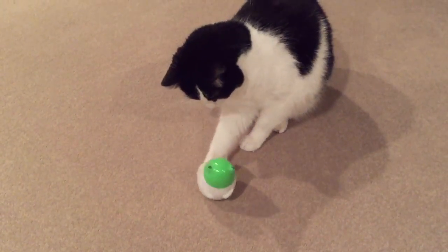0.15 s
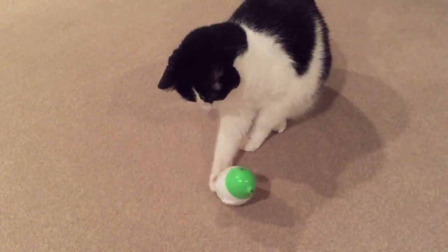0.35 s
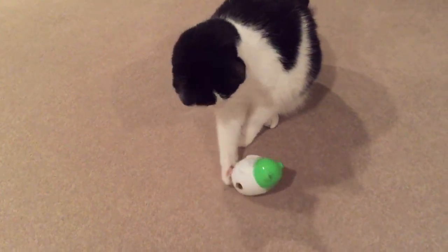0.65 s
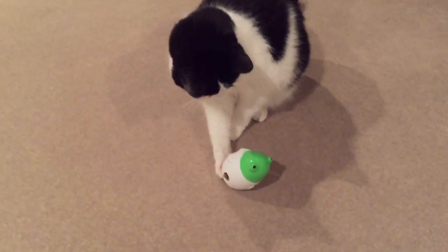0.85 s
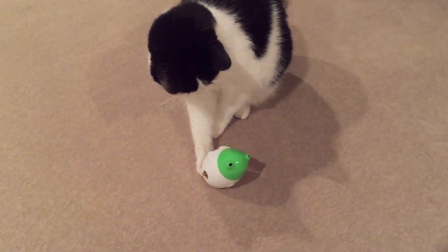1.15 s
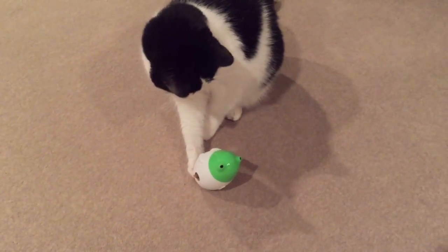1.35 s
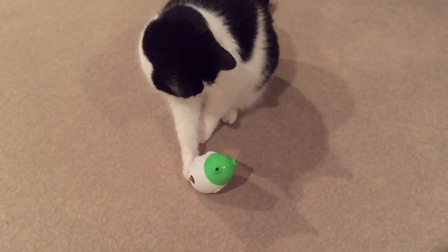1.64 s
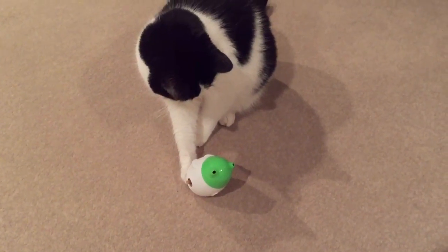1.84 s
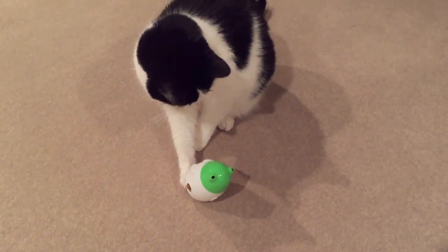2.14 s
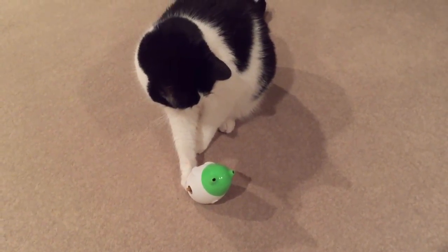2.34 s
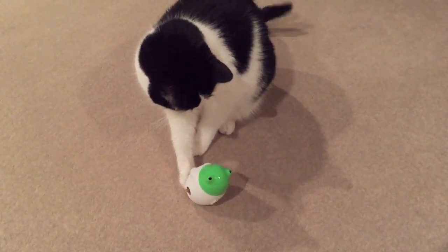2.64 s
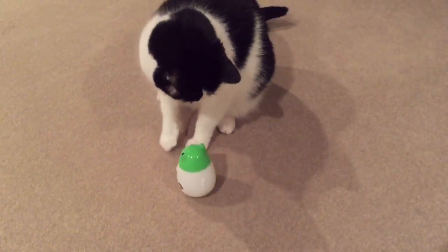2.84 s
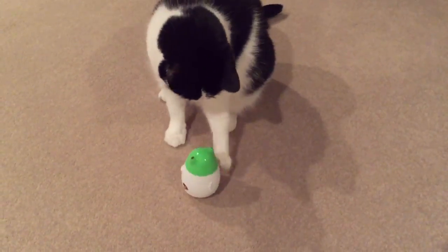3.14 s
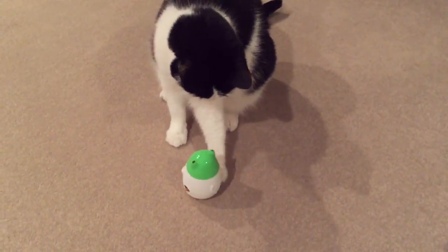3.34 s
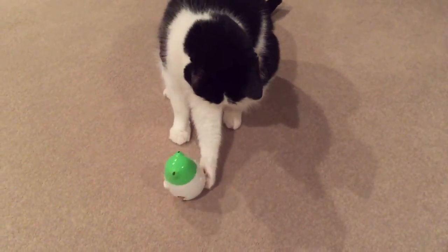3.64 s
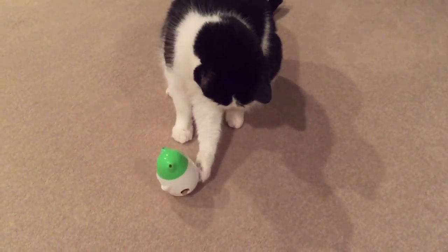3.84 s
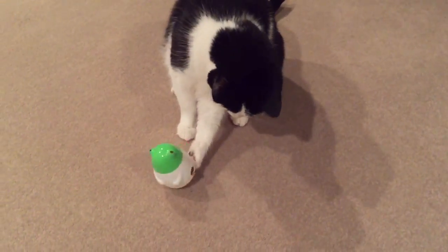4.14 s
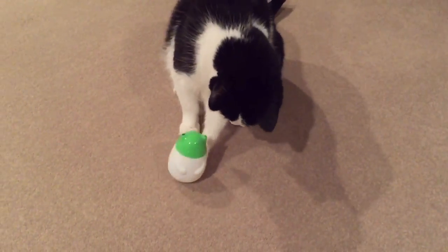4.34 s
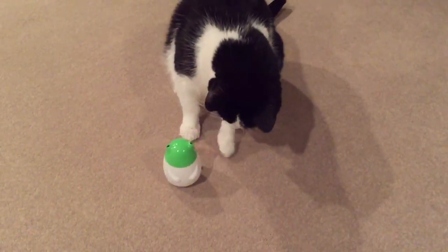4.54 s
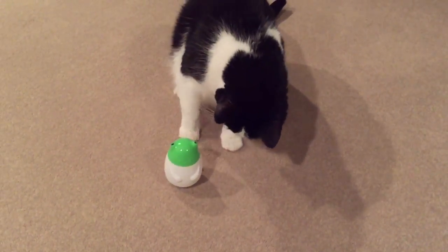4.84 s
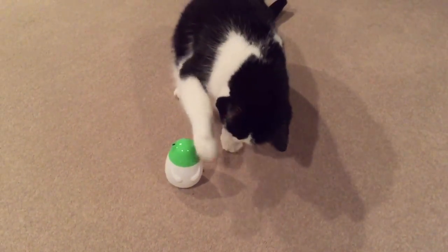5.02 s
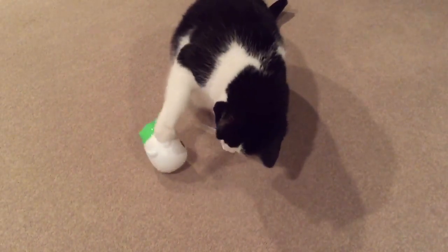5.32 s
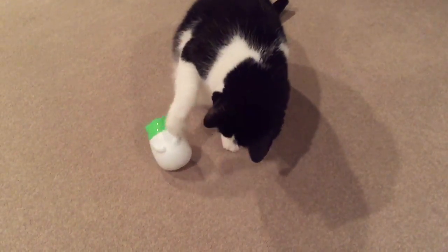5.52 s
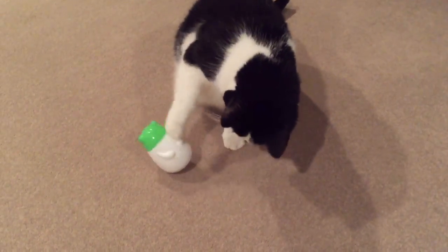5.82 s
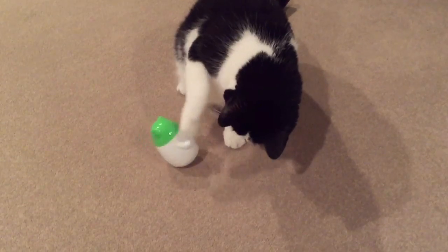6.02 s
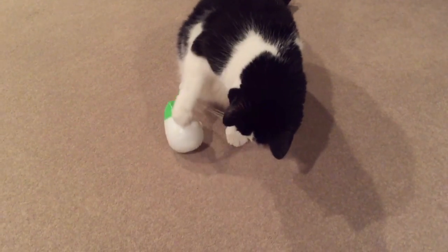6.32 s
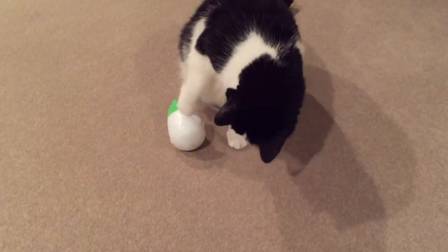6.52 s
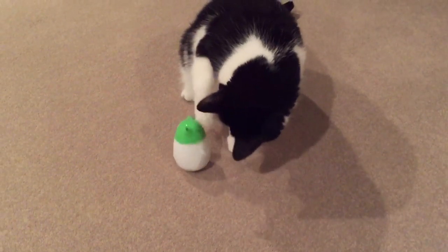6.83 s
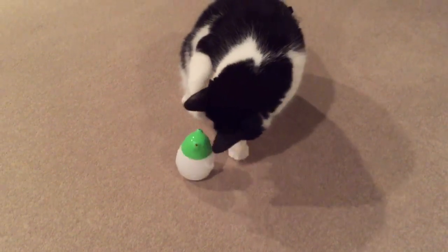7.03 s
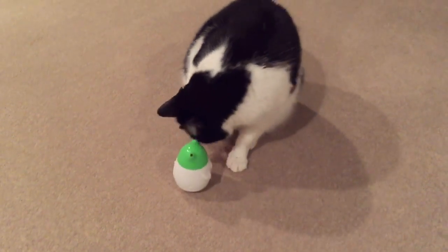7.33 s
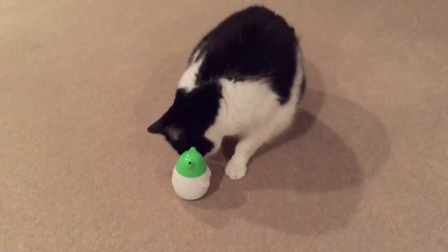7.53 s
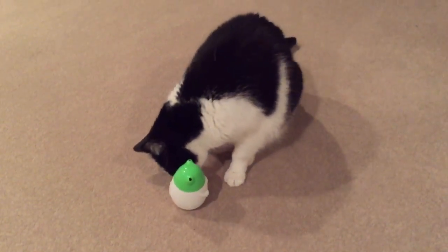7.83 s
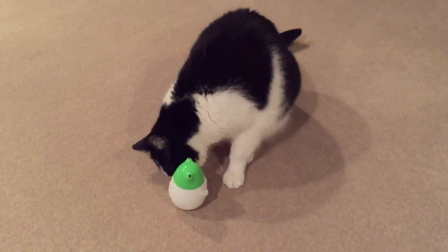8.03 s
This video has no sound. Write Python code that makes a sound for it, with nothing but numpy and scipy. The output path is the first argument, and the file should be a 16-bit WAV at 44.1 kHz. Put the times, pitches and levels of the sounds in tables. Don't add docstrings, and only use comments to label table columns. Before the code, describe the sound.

Close up in a small carpeted room, a cat paws a hollow plastic treat toy. Dull knocks and light clicks come first, then quiet with only faint low house rumble and microphone hiss. A few soft taps follow, another pause, then brisk rattling bursts of dry treats as it is rolled, dragged and swung upright, ending on bright clicks and quiet.

```python
import sys
import numpy as np
from scipy import signal
from scipy.fft import rfft, irfft, next_fast_len
from scipy.io import wavfile
from scipy.ndimage import map_coordinates

SR = 44100
rng = np.random.default_rng(int(sys.argv[2]) if len(sys.argv) > 2 else 0)


def amplitude_ratio(level_db):
    exponent = np.asarray(level_db, float) / 20
    return 10 ** exponent


def materialize(psi):
    bounded = np.clip(np.atleast_2d(psi).T, -1, 1)
    quanta = np.round(bounded * 32767).astype(np.int16)
    wavfile.write(sys.argv[1], SR, quanta)


N = 360289

# time [s], level [dB].
HOUSE_RUMBLE = [(0.0, -57), (0.7, -66), (0.77, -60.5), (1.48, -65), (1.59, -54), (1.68, -66), (1.82, -58),
                (1.98, -70), (2.0, -59.5), (4.69, -60.5), (5.44, -65), (5.48, -61.5), (6.91, -59.5),
                (6.96, -74), (7.12, -57), (7.83, -64), (8.1, -53.5), (8.17, -55.5)]
# frequency [Hz], width [Hz], level [dB].
ROOM_BOOM = [(59.7, 6.1, 4), (78.7, 13, 1.5), (103.1, 7.4, 2), (120, 9.4, -18)]
# frequency [Hz], 60 dB decay time [s].
ROOM_DECAY = [(400, 0.18), (1500, 0.19), (3000, 0.21), (6000, 0.15), (11000, 0.16), (16000, 0.097)]
# frequency [Hz], level per Hz [dB].
MIC_HISS = [(88, -30), (150, -5.5), (242, -1.5), (295, -9), (332, -1), (359, -9.5), (439, -9.5),
            (514, -13.5), (568, -11), (812, -16.5), (952, -14.5), (1140, -16), (3200, -18.5), (4850, -20.5),
            (17300, -28.5)]
# frequency [Hz], width [Hz], depth [dB].
MIC_DIPS = [(4900, 250, -3.5), (7700, 350, -2.5), (10450, 380, -7)]
# start [s], length [s], slide of the crumbs [dB], carpet rub [dB].
PUSHES = [(-0.05, 0.12, -59, -65), (0.211, 0.025, -59, -82), (0.07, 0.15, -83, -69),
          (0.308, 0.19, -60, -66.5), (0.529, 0.14, -69, -64), (0.645, 0.23, -63, -64.5),
          (2.9, 0.28, -87, -77), (3.528, 0.17, -63, -63.5), (3.77, 0.21, -71, -68.5),
          (4.087, 0.22, -69, -71.5), (5.344, 0.062, -79, -56), (5.453, 0.061, -66, -64),
          (5.528, 0.054, -38, -73), (5.79, 0.094, -58, -54.5), (6.04, 0.055, -53.5, -93),
          (6.246, 0.3, -65, -64), (6.556, 0.13, -43.5, -59), (7.016, 0.063, -68, -62),
          (7.082, 0.16, -48.5, -61)]
# time [s], peak [dB], hollow pitch [Hz], wall thud [dB].
KNOCKS = [(0.09, -37, 584, 0), (0.255, -57, 610, 5.5), (0.3615, -47, 576, 3), (0.551, -42, 526, -1.5),
          (0.662, -44.5, 560, -1), (3.0, -75, 600, 13), (3.025, -55.5, 630, 5.5), (3.553, -52.5, 510, 3),
          (3.6655, -54, 557, 8), (3.677, -48.5, 512, 5.5), (4.273, -50, 600, 4), (4.502, -48, 570, -4),
          (5.3655, -42.5, 560, 4), (5.38, -46, 568, -19), (5.833, -56, 585, -14), (5.87, -58, 600, 3),
          (6.4322, -38, 539, -5), (6.482, -56, 575, -12), (6.636, -42.5, 506, -1.5),
          (7.036, -56.5, 486, -20), (7.087, -50, 495, -1), (7.146, -44.5, 562, -2), (7.104, -50, 547, -15),
          (7.18, -56, 550, -20)]
# frequency [Hz], level [dB], 60 dB decay time [s].
SHELL_MODES = [(1660, -13.5, 0.058), (2050, -13.5, 0.054), (2380, -11.5, 0.013), (2750, -14, 0.054),
               (3250, -12, 0.028), (3550, -10.5, 0.042), (3930, -9.5, 0.025), (4250, -11, 0.022),
               (4790, -13.5, 0.02), (5280, -10.5, 0.017), (5620, -9, 0.0089), (6130, -10.5, 0.01),
               (7100, -12, 0.01), (8970, -13.5, 0.013)]
# frequency [Hz], level [dB].
CONTACT_NOISE = [(2000, -32), (5000, -1.5), (8000, -1), (11000, -13), (14000, -12), (17000, -35)]
# time [s], peak [dB], main mode [Hz], second mode [Hz], sharp tick [dB].
STRIKES = [(0.4212, -34.5, 3580, 7100, 1), (0.7579, -33, 5620, 3450, -15), (0.963, -29, 5540, 3900, -6),
           (3.036, -34, 5000, 2250, -9.5), (3.9623, -28, 4360, 5700, -32), (5.454, -43, 3820, 5250, 7),
           (5.4663, -27.5, 3700, 2830, -6), (5.529, -30, 3220, 4730, -17), (5.538, -22.5, 3970, 2920, -10),
           (5.5465, -22.5, 3260, 3980, -3), (5.5546, -28, 2830, 4260, -2.5),
           (5.5671, -25.5, 3700, 4800, -6), (6.0023, -41, 3500, 1730, -4), (6.057, -31, 3800, 4160, 1),
           (6.5977, -25, 3300, 4260, -20), (6.6076, -21.5, 5230, 3300, -8), (6.6234, -23, 4150, 5540, 1),
           (6.6414, -38, 3060, 4090, -1), (6.67, -26.5, 3730, 2170, -10), (7.0108, -31, 5930, 3930, -32),
           (7.0874, -27, 2440, 4200, -17), (7.139, -25, 3730, 6600, -7.5), (7.1643, -29, 5660, 3700, -6),
           (7.1908, -18, 5060, 3040, -12)]
# time [s], peak [dB], main mode [Hz], sharp tick
# [dB].
LIGHT_TAPS = [(0.0906, -38.5, 2040, -6), (0.0938, -35, 1880, -38), (0.2493, -46.5, 5650, -15),
              (0.2525, -53, 2140, -20), (0.361, -34, 1630, -23), (0.9878, -44, 3750, -24.5),
              (0.4314, -46, 3930, -23), (0.4689, -50, 5800, -17), (0.5527, -39.5, 1570, -18),
              (0.5549, -51, 1950, -21), (0.6495, -44, 5570, -1), (0.6622, -41, 1940, -29),
              (0.6743, -36, 3170, -6), (0.6875, -45, 3040, -26), (0.705, -42, 3180, -23),
              (0.7198, -38, 3140, -17), (0.7676, -37, 5670, -25), (0.7737, -29, 3380, -11),
              (0.811, -42, 3970, -23), (0.872, -53.5, 4350, 4), (0.887, -56, 4600, -7),
              (2.9033, -60.5, 3960, -7), (2.9662, -39, 2320, -16), (3.0265, -54, 2230, -29),
              (3.052, -50, 3900, -20), (3.555, -48.5, 3660, -28), (3.6668, -50, 3730, -21),
              (3.6759, -37.5, 1910, -37), (3.8078, -54, 4160, -15), (3.8213, -47, 4250, -9),
              (4.0741, -56.5, 3200, -17), (4.273, -53.5, 2050, -7), (4.5037, -51.5, 2170, -27),
              (5.3657, -32.5, 1450, -42), (5.3815, -38.5, 1230, -24), (5.431, -55, 3300, -27),
             (5.63, -44, 3720, -8), (5.495, -42, 3760, -17), (5.7683, -53.5, 2280, 2.5),
             (5.816, -49, 3620, -10), (5.836, -47, 2320, -24), (5.868, -50, 2300, -10),
             (5.894, -45, 3450, -23), (5.9104, -46, 3240, -22), (6.012, -46, 2720, -13),
             (5.8086, -45, 4300, -21), (5.809, -45, 2100, -25), (5.8451, -44.5, 2230, 6),
             (5.852, -46, 4500, -18), (5.8807, -32.5, 3550, -33), (5.886, -42, 1990, -20),
             (5.829, -54, 3500, -12), (5.9265, -33.5, 3570, -11), (5.9443, -41.5, 3600, -7),
             (6.031, -34, 3400, -12), (6.0363, -36.5, 3620, -4), (6.042, -28.5, 4260, -14.5),
             (6.0857, -40, 3660, -5),
              (6.2618, -41.5, 5380, -1), (6.276, -39.5, 3760, -6), (6.281, -40, 3760, -4),
             (6.292, -43.5, 2860, -19), (6.349, -40.5, 2180, -8), (6.368, -48.5, 2110, -21),
             (6.399, -49.5, 3160, -2), (6.4316, -37, 1970, -16), (6.4818, -46, 3440, -12),
             (6.494, -46.5, 2140, -7), (6.53, -39, 5600, 0.5), (6.5336, -40.5, 2170, -25),
             (6.5638, -31, 3630, -11), (6.5771, -35, 3250, -15), (6.604, -36, 5350, 6),
             (6.675, -28, 4970, 6.5), (6.6999, -33, 3800, -10), (7.034, -39, 4100, -9),
             (7.0772, -46, 4000, -25), (7.095, -32, 2140, -14), (7.113, -39, 2580, -26),
             (7.1223, -33.5, 3400, 3), (7.1276, -31, 4050, -16), (7.1884, -38, 3520, -9),
             (6.588, -47, 5200, -8), (7.1775, -50, 2280, -14), (7.1974, -30, 2800, -3.5),
             (7.1994, -33, 4250, -26), (6.1996, -62, 3380, -17), (6.5923, -27, 4100, -14),
             (6.655, -37, 4160, -20), (6.941, -61, 2220, -13), (7.154, -35, 5450, -16)]
# time [s], mode [Hz], level [dB], other mode [Hz], its level [dB].
CONTACT_RINGS = [(0.0912, 3470, -44, 5300, -44.5), (0.0936, 1960, -38.5, 2700, -55),
                 (0.361, 1930, -39, 1294, -43.5), (0.4208, 3420, -38, 4000, -39.5),
                 (0.4208, 7150, -39, 2190, -46), (0.5525, 1950, -43.5, 1600, -47.5),
                 (0.6617, 1940, -41, 1370, -42), (0.674, 3160, -36.5, 5300, -38),
                 (0.674, 3500, -55, 4400, -42), (0.6873, 3100, -44, 1750, -52),
                 (0.7573, 5620, -36, 3500, -35.5), (0.7586, 4660, -35, 1710, -47),
                 (0.7668, 5760, -41, 3920, -43), (0.7742, 1670, -44.5, 4700, -38),
                 (0.7742, 5800, -49, 4230, -50), (0.9629, 5630, -24.5, 3820, -29.5),
                 (0.9878, 3800, -45, 5940, -45), (2.966, 3530, -64, 4060, -65), (3.0367, 3800, -39, 5460, -52),
                 (3.0367, 5300, -42.5, 2330, -40), (3.5544, 3930, -45, 2050, -54.5),
                 (3.6763, 1930, -41.5, 2290, -44.5), (3.9625, 4100, -29, 3550, -39),
                 (3.9625, 5740, -32.5, 5320, -52), (5.3655, 1390, -39, 1900, -45),
                 (5.4531, 3960, -35, 3370, -35), (5.4531, 5190, -39, 6500, -37),
              (5.4656, 3410, -28.5, 2660, -48), (5.4656, 1570, -38.5, 7100, -34.5),
              (5.5283, 3340, -43, 3970, -38), (5.5338, 3160, -34, 3850, -40),
              (5.5328, 2680, -48, 4650, -40), (5.538, 4000, -35, 3180, -32), (5.538, 2800, -40, 3620, -34),
              (5.5462, 3230, -21, 3500, -37), (5.5462, 3900, -29, 4760, -30.5),
              (5.5552, 2810, -28, 3430, -27), (5.549, 1620, -41, 2200, -46), (5.5678, 3600, -39, 4370, -35),
              (5.5678, 3980, -41, 5630, -39), (5.574, 3350, -44, 2900, -51), (5.576, 3800, -38, 2830, -48),
              (5.8447, 2300, -49, 1830, -50), (5.8815, 3550, -43, 4370, -43),
              (5.9264, 2820, -42, 3660, -39), (5.9443, 3500, -43, 4160, -62),
              (6.0018, 3540, -33, 1660, -42), (6.0018, 3180, -42, 2550, -57),
              (6.031, 3700, -33, 3160, -35.5), (6.0307, 1670, -44.5, 5280, -50),
              (6.0359, 3370, -40, 4200, -43), (6.0417, 4420, -35.5, 3420, -40),
              (6.0567, 3670, -28.5, 3230, -35), (6.0567, 4100, -31, 1650, -46),
              (6.061, 3540, -34, 3980, -48), (6.0857, 3470, -37.5, 3300, -50),
                 (6.2762, 3680, -56, 5900, -42), (6.4317, 2270, -42, 3770, -46.5),
              (6.5632, 3680, -52, 3260, -43), (6.5632, 2640, -39, 4250, -37),
              (6.5794, 3240, -38, 2200, -45), (6.5925, 3200, -32, 4270, -37.5),
              (6.5925, 3640, -41, 5300, -45), (6.5976, 3220, -32, 3660, -40),
              (6.5976, 4400, -40, 4100, -35), (6.6074, 5280, -28, 3530, -38),
              (6.6074, 4250, -34, 2000, -34.5), (6.6165, 3600, -39, 3240, -35),
              (6.6185, 4200, -32, 7000, -34), (6.6235, 5400, -28, 3920, -34),
              (6.6235, 3600, -41, 1950, -38), (6.641, 3100, -32.5, 4090, -34),
              (6.641, 1940, -39, 4920, -37), (6.6553, 2820, -40, 2120, -48), (6.6553, 3570, -47, 5040, -45),
              (6.6699, 3900, -30, 4440, -39), (6.6699, 1730, -42, 2080, -43),
              (6.6747, 5100, -30.5, 4500, -33), (6.6747, 3770, -37, 7900, -35),
              (6.6793, 2750, -40, 3720, -50), (6.6998, 3200, -36, 3970, -43),
              (6.6998, 2780, -41, 2100, -44),
                 (7.0099, 6000, -31.5, 4010, -32), (7.0105, 2100, -41.5, 3470, -44),
                  (7.0342, 4030, -38.5, 6040, -42.5), (7.0871, 2620, -35, 2250, -39),
                  (7.0872, 4140, -39, 3340, -39), (7.0944, 6100, -36, 2290, -41),
                  (7.11, 2610, -39, 2000, -42), (7.1166, 2100, -38, 2360, -52),
                  (7.1224, 3500, -41, 4210, -38), (7.1224, 6120, -33, 2630, -38),
                  (7.127, 3940, -41, 3400, -44), (7.127, 6160, -37, 7200, -34),
                  (7.1388, 3760, -45, 6430, -35), (7.1388, 5260, -40, 2280, -38),
                  (7.1451, 3960, -43, 3530, -46), (7.1533, 5430, -39, 4250, -38),
                  (7.1644, 5460, -31, 6250, -28), (7.1644, 3730, -32, 7700, -30),
                  (7.1713, 6140, -43, 4000, -42), (7.1713, 3600, -44, 6940, -36),
                  (7.1782, 2270, -37, 6170, -36), (7.1909, 3860, -28, 2700, -27.5),
                  (7.19, 3460, -26.5, 5660, -29), (7.197, 3900, -27, 2930, -41),
                  (7.198, 5500, -40, 7060, -29), (7.2035, 4100, -41, 3470, -35),
                  (7.201, 2550, -41, 6070, -36), (7.209, 2830, -48, 3940, -49)]
TAPS = LIGHT_TAPS
RINGS = CONTACT_RINGS

HISS_DB, MIC_TOP_HZ = -69.5, 17230
SWELL_DB, FADE_DB_PER_S = 6, 213
SECOND_DB, TAP_SECOND_DB = -2.5, -1.5
PARTNER, FOLD_HZ = 1.5, 4370
STIFF_HZ, CHOKED_DB, STIFF_CHOKED_DB = 4900, -14, -10
SAME_BLOW_S, LEAD_S = 0.0025, 0.0003
RING_T60_S, RING_RISE_S = 0.01, 0.00031
CHATTER_DB, CHATTER_S, CROWD_S = -13, 0.014, 0.021


def along(points, hz):
    f, value = np.transpose(points)
    return np.interp(np.log(hz + 1), np.log(f + 1), value)


def noise(response):
    m = next_fast_len(N + 8192)
    x = irfft(rfft(rng.standard_normal(m)) * response(np.fft.rfftfreq(m, 1 / SR)), m)[:N]
    return x / np.std(x)


def wobble(rate):
    knots = rng.standard_normal(int(N * rate / SR) + 4)
    return map_coordinates(knots, [np.arange(N) * rate / SR])


def resonance(f, center, width):
    return f * width / (center ** 2 - f * f + 1j * f * width)


def ring(hz, t60, rise, t):
    swing = amplitude_ratio(-60 * t / t60) * (1 - np.exp(-t / rise)) ** 2
    return swing / swing.max() * np.sin(2 * np.pi * hz * t)


def burst(hz, width, t):
    u = t / width
    return (u * np.exp(1 - u)) ** 1.1 * np.sin(2 * np.pi * hz * t)


def house():
    def boom(f):
        lumps = sum(amplitude_ratio(db) * np.abs(resonance(f, c, w)) for c, w, db in ROOM_BOOM)
        return lumps / (1 + (48 / (f + 1)) ** 6) / (1 + (f / 165) ** 4)

    level_db = np.interp(np.arange(N) / SR, *np.transpose(HOUSE_RUMBLE))
    return amplitude_ratio(level_db + 2.55 * wobble(11)) * noise(boom)


def tails(count):
    hz, t, z = signal.stft(rng.standard_normal((count, SR // 3)), SR, nperseg=128)
    decay = amplitude_ratio(-60 * t / along(ROOM_DECAY, hz)[:, None])
    tail = signal.istft(z * decay, SR, nperseg=128)[1]
    t = np.arange(tail.shape[1]) / SR
    tail = tail * (1 - np.exp(-(t / 0.009) ** 2))
    return tail / np.linalg.norm(tail, axis=1, keepdims=True)


def add(track, s, sound, answer, wet_db):
    start = round(s * SR)
    track[start:][:len(sound)] += sound
    wet = amplitude_ratio(wet_db) * signal.fftconvolve(sound, answer)
    track[start:][:len(wet)] += wet


def contacts():
    hits = [(s, db, hz, second_hz, SECOND_DB, tick_db) for s, db, hz, second_hz, tick_db in STRIKES]
    for s, db, hz, tick_db in TAPS:
        second_hz = hz * PARTNER ** np.sign(FOLD_HZ - hz)
        hits.append((s, db, hz, second_hz, TAP_SECOND_DB, tick_db))
    return hits


def effort_db(t, start, length):
    u = t - start
    swell_and_fade = np.minimum(SWELL_DB * (u / length - 1), -FADE_DB_PER_S * (u - length))
    return np.where(u < 0, -150, swell_and_fade)


def pushed(column):
    t = np.arange(N) / SR
    return sum(amplitude_ratio(row[column] + effort_db(t, *row[:2])) for row in PUSHES)


def jostle():
    s, db = np.transpose(contacts())[:2]
    at = (s * SR).astype(int)

    def near(weight):
        return np.abs(signal.fftconvolve(np.bincount(at, weight, N), np.hanning(SR // 16), "same"))

    crowd = np.clip((near(np.ones(len(s))) - 1.3) / 0.36, 0, 1)
    return crowd * np.sqrt(near(amplitude_ratio(2 * db)))


def skitter(tumble):
    def shell(f):
        modes = sum(amplitude_ratio(db) * resonance(f, c, 420) * (-1) ** k for k, (c, db, _) in enumerate(SHELL_MODES))
        return np.abs(modes) / (1 + (f / 5000) ** 2)

    grains = amplitude_ratio(3 * wobble(300) + 2 * wobble(28))
    crumbs = noise(shell) * grains / np.sqrt(np.mean(grains ** 2))
    return (amplitude_ratio(-9.5) * pushed(column=2) + amplitude_ratio(-34) * tumble) * crumbs


def rub_and_tumble(tumble):
    def hollow(f):
        return np.abs(resonance(f, 560, 130)) + 0.58 * np.abs(resonance(f, 1300, 1300))

    def air(f):
        low = np.abs(resonance(f, 575, 70)) ** 2
        return low + 0.11 * np.abs(resonance(f, 1670, 60)) + np.abs(resonance(f, 2300, 90))

    push = pushed(column=3)
    rub = amplitude_ratio(-7) * push * noise(hollow) * amplitude_ratio(3 * wobble(40))
    stirred = (amplitude_ratio(-55) * np.sqrt(tumble) + amplitude_ratio(-11) * push) * noise(air)
    drumming = amplitude_ratio(-64) * tumble * noise(hollow)
    return rub + stirred + drumming


def knocks(room):
    track, t = np.zeros(N + SR), np.arange(SR // 8) / SR
    thud = ring(785, 0.012, 0.00039, t) - amplitude_ratio(0.5) * ring(1098, 0.0066, 0.00074, t)
    thud += amplitude_ratio(-0.5) * ring(1285, 0.0049, 0.00048, t) + amplitude_ratio(-7) * burst(1440, 0.00021, t)
    for k, (s, db, hollow_hz, thud_db) in enumerate(KNOCKS):
        answer = room[k % len(room)]
        hollow = ring(hollow_hz, 0.044, 0.0006, t)
        hollow -= amplitude_ratio(-7) * ring(1.118 * hollow_hz, 0.04, 0.0017, t)
        add(track, s, amplitude_ratio(db) * hollow, answer, wet_db=-12)
        add(track, s, amplitude_ratio(db + thud_db - 1.5) * thud, answer, wet_db=-5)
    return track[:N]


def chatter(room):
    s, db = np.transpose(contacts())[:2]
    neighbours = (np.abs(s[:, None] - s) < CROWD_S).sum(axis=1)
    crowd = np.clip((neighbours - 2) / 3, 0, 1)
    t = np.arange(SR // 200) / SR
    when, pitch, size = rng.random((3, len(s), 6, 1))
    hz = 2300 * 2.9 ** pitch
    level = (crowd * amplitude_ratio(db + CHATTER_DB))[:, None, None] * amplitude_ratio(-12 * size)
    grains = level * burst(hz, 1.24 / hz, t)
    at = ((s[:, None, None] + CHATTER_S * when + t) * SR).astype(int)
    direct = np.bincount(at.ravel(), grains.ravel(), N)[:N]
    return direct + amplitude_ratio(-8.5) * signal.fftconvolve(direct, room[0])[:N]


def rings(room):
    track, t = np.zeros(N + SR), np.arange(SR // 25) / SR
    struck = np.transpose(contacts())[0]

    def mode(hz, db):
        return amplitude_ratio(db) * ring(hz, RING_T60_S * (3500 / hz) ** 0.5, RING_RISE_S, t)

    for k, (s, hz, db, other_hz, other_db) in enumerate(RINGS):
        blow = struck[np.abs(struck - s).argmin()]
        start = blow if abs(blow - s) < SAME_BLOW_S else s
        wet_db = -9 if hz < 2300 else -15
        add(track, start - LEAD_S, mode(hz, db) - mode(other_hz, other_db), room[-k % len(room)], wet_db)
    return track[:N]


def clicks(room):
    track, t = np.zeros(N + SR), np.arange(SR // 40) / SR
    hits = contacts()
    rung = np.transpose(RINGS)[0]
    luck = rng.standard_normal((len(hits), 2, len(SHELL_MODES)))
    white = rfft(rng.standard_normal((len(hits), len(t))))
    grit = irfft(white * amplitude_ratio(along(CONTACT_NOISE, np.fft.rfftfreq(len(t), 1 / SR))), len(t))
    grit = grit / np.std(grit)
    snap = burst(9660, 0.00014, t) + amplitude_ratio(-11.5) * burst(16200, 0.000096, t)
    for k, (s, db, main_hz, second_hz, second_db, tick_db) in enumerate(hits):
        width = 0.00065 * (4000 / main_hz) ** 0.3
        near = burst(main_hz, width, t) - amplitude_ratio(second_db) * burst(second_hz, 0.32 * width, t)
        if np.abs(rung - s).min() < SAME_BLOW_S:
            near = near * amplitude_ratio(CHOKED_DB if main_hz < STIFF_HZ else STIFF_CHOKED_DB)
        crack = amplitude_ratio(-3) * burst(1.52 * main_hz, 0.0001, t)
        rest = np.zeros(len(t))
        for (hz, level, t60), g, d in zip(SHELL_MODES, *luck[k]):
            from_second = abs(np.log2(hz / second_hz)) - second_db / 15
            apart = min(abs(np.log2(hz / main_hz)), from_second)
            gain = amplitude_ratio(level + 2 * g - 12 * apart) * np.sign(g)
            rest += gain * ring(hz * (1 + 0.014 * d), 0.72 * t60, 0.00032, t)
        tick = amplitude_ratio(tick_db - 2) * (snap + amplitude_ratio(-2 - 60 * t / 0.013) * grit[k])
        click = amplitude_ratio(db - 2) * (near + crack + rest + tick)
        add(track, s - LEAD_S, click, room[k % len(room)], wet_db=-12.5)
    no_bass = signal.butter(2, 950, "high", fs=SR, output="sos")
    return signal.sosfilt(no_bass, track[:N])


def scene():
    room = tails(count=23)
    tumble = jostle()
    background = house() + skitter(tumble) + rub_and_tumble(tumble)
    toy = knocks(room) + chatter(room) + rings(room) + clicks(room)
    return (background + toy)[None]


def low_pass(x):
    return signal.sosfilt(signal.butter(12, 18200, fs=SR, output="sos"), x)


def record(dry):
    def hiss_gain(hz):
        dips = sum(db * np.exp(-((hz - c) / w) ** 2) for c, w, db in MIC_DIPS)
        return amplitude_ratio(along(MIC_HISS, hz) + dips)

    heard = dry + amplitude_ratio(HISS_DB) * noise(hiss_gain)
    m = next_fast_len(N)
    in_band = np.fft.rfftfreq(m, 1 / SR) < MIC_TOP_HZ
    mix = irfft(rfft(heard, m) * in_band, m)[:, :N]
    return low_pass(mix)


dry = scene()
out = record(dry)
materialize(out)
```